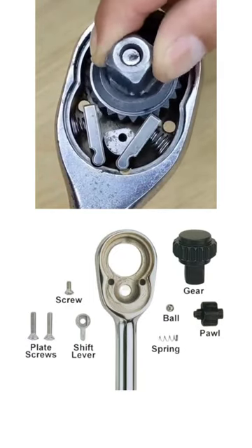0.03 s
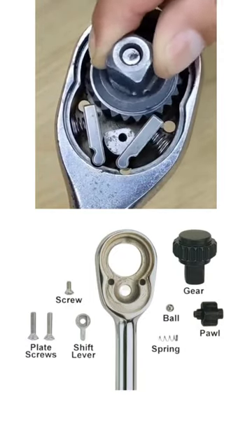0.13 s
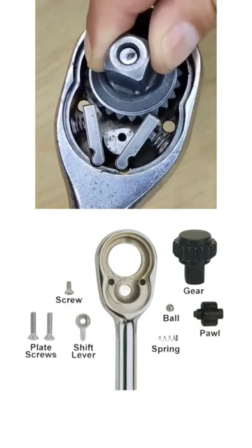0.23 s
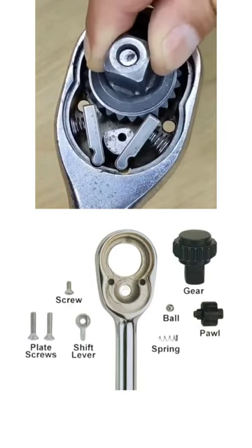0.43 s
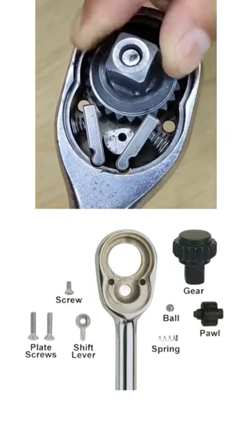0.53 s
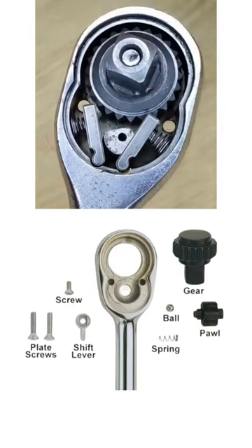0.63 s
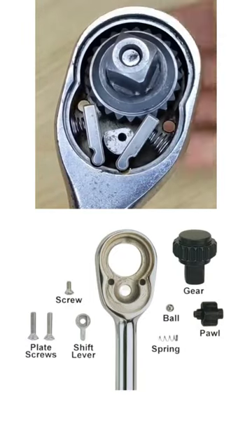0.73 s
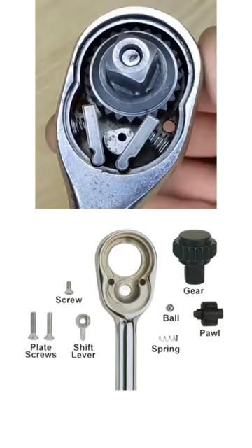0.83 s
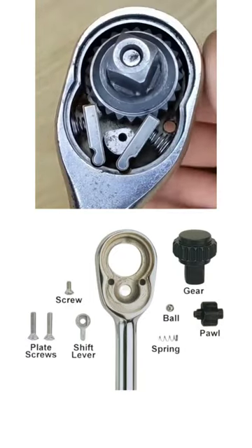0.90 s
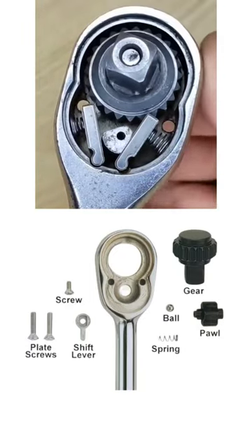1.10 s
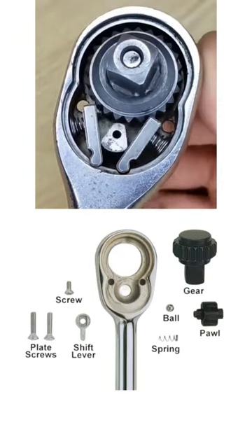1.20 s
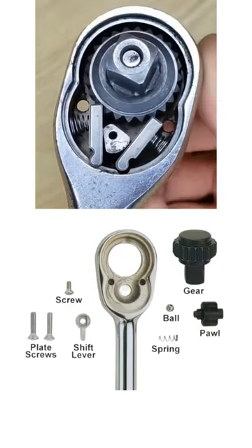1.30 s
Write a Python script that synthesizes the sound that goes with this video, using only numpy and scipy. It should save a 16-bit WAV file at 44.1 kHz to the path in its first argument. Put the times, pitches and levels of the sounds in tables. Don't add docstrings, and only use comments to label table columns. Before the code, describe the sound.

Two crisp metallic ratchet clicks from a hand-turned gear, followed by near silence and tiny taps

```python
import sys
import numpy as np
from scipy import signal
from scipy.io import wavfile

SR = 44100
rng = np.random.default_rng(int(sys.argv[2]) if len(sys.argv) > 2 else 0)


def to_wav(sig):
    pcm = np.clip(np.atleast_2d(sig), -1, 1) * 32767
    pcm = np.round(pcm).astype(np.int16)
    wavfile.write(sys.argv[1], SR, pcm.T)


def amplitude_ratio(level_db):
    exponent = np.asarray(level_db, float) / 20
    return 10 ** exponent


N = 59535

# frequency in Hz, level in dB.
AIR_SPECTRUM = [(25, -23), (140, 4.5), (500, -6), (1700, -15.5), (2100, -20), (6500, -27), (7400, -35.5),
                (12800, -29)]

# frequency in Hz, level in dB, decay time t60 in seconds.
STEEL_MODES = [(6470, -7.5, 0.0054), (7460, -5, .008), (8220, -5.5, 0.007), (8567, -1, .009),
               (8840, -0.5, .01), (8970, -6, .008), (9330, -0.5, 0.0059), (9800, -4.5, 0.0036),
               (10650, -5, 0.0062), (11550, -9.5, .006), (12500, -12, 0.0066)]

# frequency in Hz, level in dB.
ROOM_SPECTRUM = [(200, -7), (700, -4), (1600, -4.5), (2400, -21.5), (4000, -1.5), (6000, -1.5), (9000, 0),
                 (13000, 5)]
# frequency in Hz, decay time t60 in seconds.
ROOM_DECAY = [(200, 0.084), (1000, 0.11), (2500, .14), (5000, 0.2), (9000, .16), (13000, .15)]

# time in seconds, gain in dB.
GATE_STEPS = [(0.039, -7), (.055, -10), (.16, -10), (.17, -1), (.275, 0.5), (.285, -2.5), (.325, -2.5),
              (.335, -5.5), (.40, 4), (.41, -1.5), (0.532, -3), (.536, -9), (.62, -4), (.64, 1)]

# start in seconds, peak in dB, centre in Hz, width in octaves, t60 in seconds.
FINGER_TOUCHES = [
    (.663, -67, 3700, 0.21, 0.03),
    (.664, -67, 8700, 0.44, 0.15),
    (.8531, -51.5, 2260, .5, .008),
    (.8533, -53.5, 3500, 0.34, 0.012),
    (0.8539, -52, 4950, 1.8, 0.019),
    (.8540, -56.5, 9100, 0.45, 0.05),
    (1.006, -62.5, 9850, 0.37, 0.064),
    (1.014, -66, 9400, 0.77, .03),
    (1.31, -73, 8970, 0.26, 0.21),
    (.001, -55.5, 4007, 0.44, 0.21),
]

# start in seconds, end in seconds, start level in dB, end level in
# dB (before the last steep rise).
NOISE_SWELLS = [
    (0.176, .201, -61.5, -49.5),
    (.415, .445, -72.5, -51.5),
]
# frequency in Hz, level in dB per Hz.
SWELL_SPECTRUM = [(470, -35.5), (800, -3), (3510, -6), (7740, -7), (8820, -0.5), (11300, -4.5),
                  (13500, -9.5)]

# level in dB, rise in seconds, lean in Hz.
HEAD_LEANS = [
    (-21.5, .002, 180),
    (-19, 0.0095, 45),
]
# time in seconds, spike level in dB, spike width in seconds.
PAWL_DROPS = [
    (.2020, -8.5, 0.00011),
    (0.4463, -2.5, 0.000049),
]
# level in dB, frequency in Hz, t60 in seconds,
# slow level in dB, slow frequency in Hz.
HEAD_SWINGS = [
    (-10.5, 260, .02, -16, 140),
    (-16, 110, .01, -21.5, 99),
]
# delay in seconds, level in dB.
DESK_RETURNS = [
    (0.0053, -15.5),
    (.0036, -10.5),
]
# frequency in Hz, t60 in seconds,
# first drop in dB, second drop in dB.
HEAD_MODES = [(1520, 0.11, -33.5, -52), (1700, 0.17, -49.5, -40), (2865, .16, -46, -50.5),
              (3700, .14, -43, -49.5), (4744, .12, -45, -49.5), (7540, 0.15, -47, -36.5),
              (8700, .25, -59.5, -70)]

# time in seconds, level in dB.
PAWL_TOUCHES = [(0.2003, -23), (.2024, -10.5), (.2036, -12), (.2047, -16), (.2071, -10), (.2081, -18.5),
                (.2090, -16.5), (.2097, -18), (.2104, -16.5), (.2118, -17), (.2129, -23), (.2143, -21),
                (.2182, -21), (.2203, -22.5), (.2240, -25), (.2268, -25.5), (.2298, -24.5), (.2320, -21.5),
                (.2349, -20.5), (.2384, -20.5), (.4438, -32.5), (.4449, -12.5), (.4456, -13),
                (.4464, -12.5), (0.4472, -9.5), (0.4481, -18), (0.4495, -23), (0.4513, -21),
                (0.4542, -26.5)]
# frequency in Hz, level in dB per Hz.
RATTLE_SPECTRUM = [(500, -31.5), (1500, -10), (2500, -10), (4000, 4.5), (6000, -4.5), (9000, -3),
                   (12500, -3.5)]


def rms_one(x):
    return x / np.sqrt(np.mean(x ** 2) + 1e-20)


def at_hz(points, hz):
    table_hz, values = np.array(points).T
    return np.interp(np.log(hz), np.log(table_hz), values)


def decay(t60):
    return amplitude_ratio(-60 / (t60 * SR))


def clicks_at(seconds, heights, size):
    clicks = np.zeros(size)
    clicks[(np.asarray(seconds) * SR).astype(int)] = heights
    return clicks


def ring(clicks, hz, t60):
    r, w = decay(t60), 2 * np.pi * hz / SR
    return signal.lfilter([0, np.sin(w)], [1, -2 * r * np.cos(w), r * r], clicks + 1e-18)


def band_pass(x, edges):
    return signal.sosfilt(signal.butter(2, edges, "band", fs=SR, output="sos"), x)


def noise_bands(size):
    white = rng.standard_normal((2, size))
    edges = 22 * 2 ** np.arange(0, 9.5, 1 / 3)
    bands = []
    for k, (low, high) in enumerate(zip(edges, edges[1:])):
        bands.append((np.sqrt(low * high), band_pass(white[k % 2], [low, high])))
    return bands


def coloured(spectrum, flicker_db):
    out, knots = 0, np.arange(0, N + 2000, 2000)
    for hz, band in noise_bands(N + SR // 2):
        flicker = np.interp(np.arange(N), knots, rng.standard_normal(len(knots)))
        out = out + band[-N:] * amplitude_ratio(at_hz(spectrum, hz) + flicker_db * flicker)
    return rms_one(out)


def room_air():
    return amplitude_ratio(-63.5) * coloured(AIR_SPECTRUM, flicker_db=0.7)


def chatter(seconds, db, size):
    out, luck = np.zeros(size), rng.standard_normal((len(seconds), len(STEEL_MODES)))
    for k, (hz, level_db, t60) in enumerate(STEEL_MODES):
        heights = amplitude_ratio(db + level_db - 6 + 2.0 * luck[:, k]) * np.sign(luck[:, k - 1])
        out += ring(clicks_at(seconds, heights, size), hz, t60)
    return signal.sosfilt(signal.butter(3, 6300, "high", fs=SR, output="sos"), out)


def earlier_click(lead):
    seconds = lead / SR - 0.046 + 0.004 * np.arange(4)
    return chatter(seconds, np.full(4, -22.0), N + lead)


def room(x):
    t = np.arange(SR // 2) / SR
    answer = 0
    for hz, band in noise_bands(len(t)):
        answer = answer + band * amplitude_ratio(at_hz(ROOM_SPECTRUM, hz) - 60 * t / at_hz(ROOM_DECAY, hz))
    build_s = 0.0013
    answer = answer * np.clip(t / build_s, 0, 1)
    answer = answer / np.sqrt(np.sum(answer ** 2))
    return amplitude_ratio(-9) * signal.fftconvolve(x, answer)[:len(x)]


def fingertips():
    out, t = np.zeros(N), np.arange(N) / SR
    for s, db, hz, octaves, t60 in FINGER_TOUCHES:
        burst = rng.standard_normal(N) * amplitude_ratio(-60 * np.maximum(t - s, 0) / t60) * (t >= s)
        edges = hz * 2 ** (np.array([-0.5, 0.5]) * octaves)
        puff = band_pass(burst + 1e-18, edges)
        out += amplitude_ratio(db) * puff / np.abs(puff).max()
    return out


def swelling_noise():
    t, gain = np.arange(N) / SR, np.zeros(N)
    for start, end, start_db, end_db in NOISE_SWELLS:
        swell = amplitude_ratio(np.interp(t, [start, end - 0.005, end], [start_db, end_db, end_db + 19.5]))
        gain += swell * np.clip((t - start) / 0.004, 0, 1) * (t < end)
    return gain * coloured([(300, -40)] + list(SWELL_SPECTRUM), flicker_db=1.0)


def shove(k, at, width):
    lean_db, rise, lean_hz = HEAD_LEANS[k]
    swing_db, hz, t60, slow_db, slow_hz = HEAD_SWINGS[k]
    t = np.arange(N) / SR - at
    after = np.maximum(t, 0)
    landed = 0.5 + 0.5 * np.tanh(np.clip((t - width) / width, -9, 9))
    load = amplitude_ratio(lean_db) * np.exp(np.minimum(t, 0) / rise) * np.cos(2 * np.pi * lean_hz * t)
    load *= (1 - landed) * np.clip((t + 0.011) / 0.0018, 0, 1)
    spike = amplitude_ratio(PAWL_DROPS[k][1]) * np.exp(-(t / width) ** 2)
    swing = amplitude_ratio(swing_db - 60 * after / t60) * np.cos(2 * np.pi * hz * (t - 2 * width))
    slow_swing = amplitude_ratio(slow_db - 60 * after / 0.03) * np.cos(2 * np.pi * slow_hz * t)
    return load + spike - (swing + slow_swing) * landed


def head_shove():
    out = np.zeros(N)
    for k, (s, _, width) in enumerate(PAWL_DROPS):
        lag, echo_db = DESK_RETURNS[k]
        out += shove(k, s, width)
        out += amplitude_ratio(echo_db) * shove(k, s + lag, 1.1 * width)
    drop_times = [row[0] for row in PAWL_DROPS]
    for hz, t60, *dbs in HEAD_MODES:
        clicks = clicks_at(drop_times, amplitude_ratio(dbs), N)
        dying = signal.lfilter([1], [1, -decay(t60)], clicks + 1e-18)
        rough_tone = ring(rng.standard_normal(N), hz, 0.0084 + 20 / hz)
        out += dying * rms_one(rough_tone)
    return out


def rattle():
    seconds, db = np.transpose(PAWL_TOUCHES)
    t60 = 0.023
    kicks = clicks_at(seconds, amplitude_ratio(2 * db), N)
    power = signal.lfilter([1], [1, -decay(t60) ** 2], kicks + 1e-18)
    return amplitude_ratio(-18.5) * np.sqrt(power) * coloured(RATTLE_SPECTRUM, flicker_db=1.0)


def hand_bump():
    hz, t60 = 143.6, 0.11
    clicks = clicks_at([1.322], amplitude_ratio(-52), N)
    return ring(clicks, hz, t60) + amplitude_ratio(-2.5) * ring(clicks, 2.1 * hz, t60)


def scene():
    lead = SR // 5
    seconds, db = np.transpose(PAWL_TOUCHES)
    wrench = fingertips() + head_shove() + chatter(seconds, db, N) + rattle()
    wet = room(earlier_click(lead) + np.pad(wrench, (lead, 0)))[lead:]
    gate = amplitude_ratio(np.interp(np.arange(N) / SR, *np.transpose(GATE_STEPS)))
    mix = room_air() + gate * (wrench + wet) + swelling_noise() + hand_bump()
    return mix[None]


def band_limit(x):
    return signal.sosfilt(signal.butter(12, 14220, fs=SR, output="sos"), x)


def record(dry):
    x = signal.sosfilt(signal.butter(2, 35, "high", fs=SR, output="sos"), dry)
    x = signal.sosfilt(signal.cheby2(20, 60, 13500, fs=SR, output="sos"), x)
    return band_limit(x)


dry = scene()
out = record(dry)
to_wav(out)
```